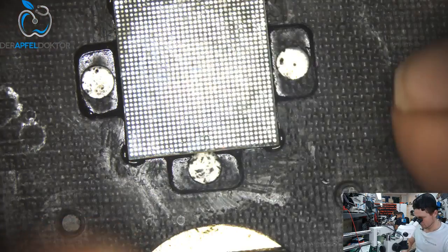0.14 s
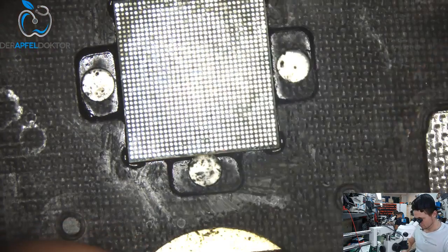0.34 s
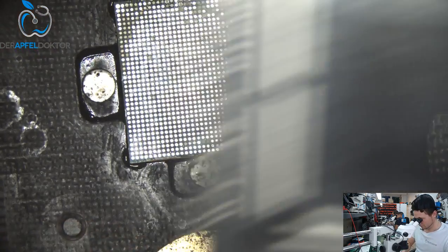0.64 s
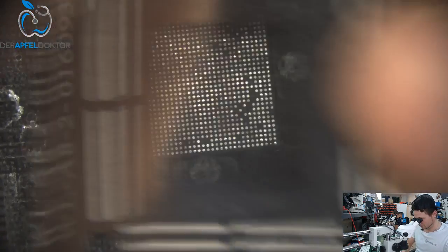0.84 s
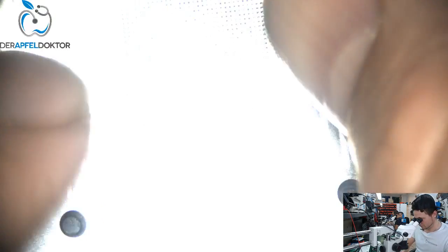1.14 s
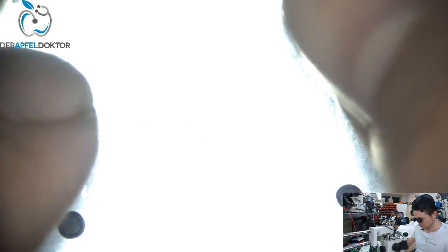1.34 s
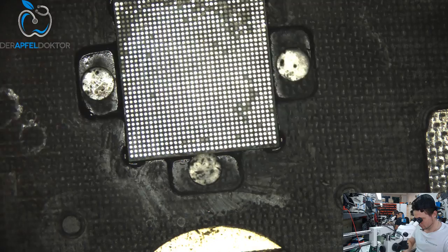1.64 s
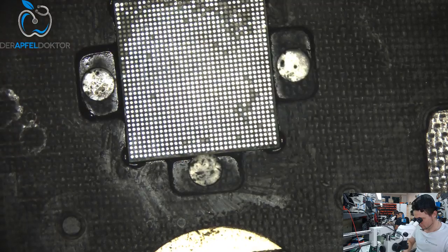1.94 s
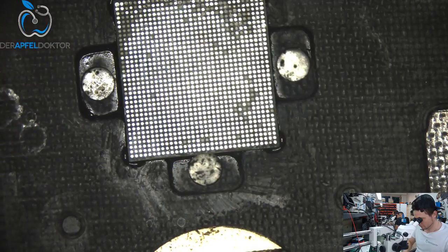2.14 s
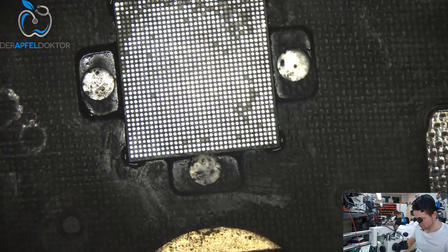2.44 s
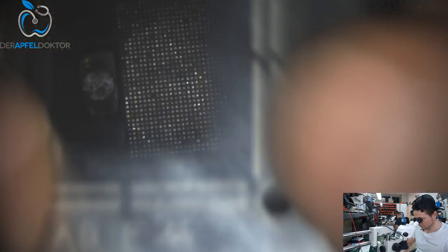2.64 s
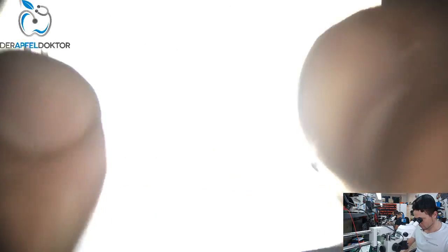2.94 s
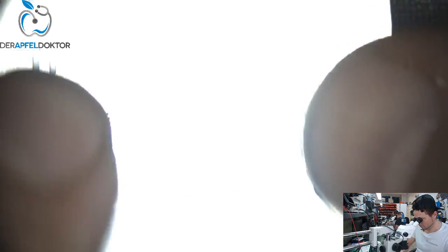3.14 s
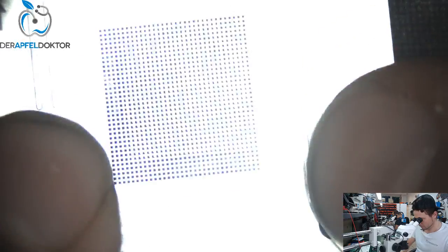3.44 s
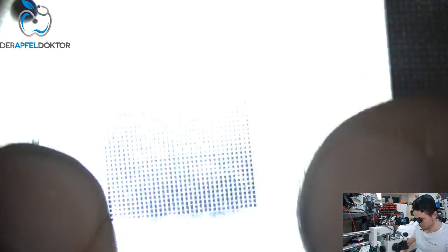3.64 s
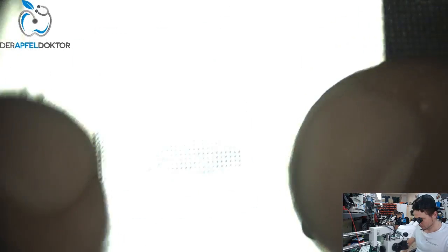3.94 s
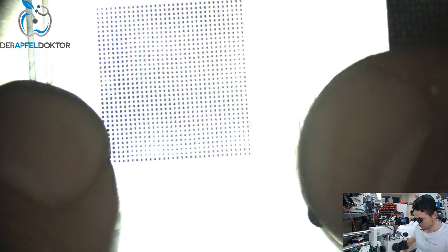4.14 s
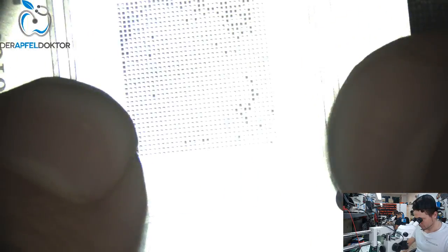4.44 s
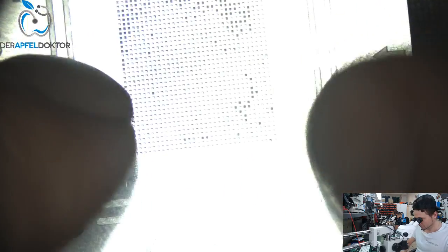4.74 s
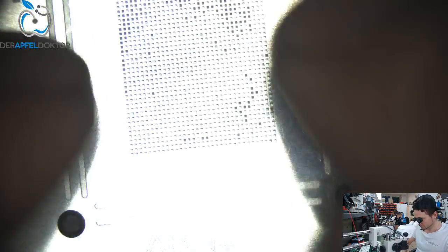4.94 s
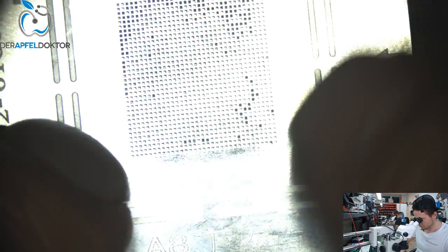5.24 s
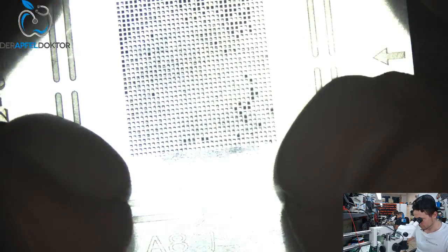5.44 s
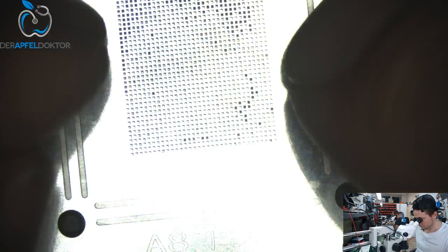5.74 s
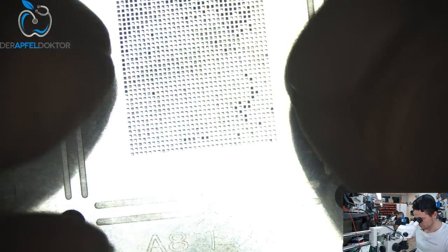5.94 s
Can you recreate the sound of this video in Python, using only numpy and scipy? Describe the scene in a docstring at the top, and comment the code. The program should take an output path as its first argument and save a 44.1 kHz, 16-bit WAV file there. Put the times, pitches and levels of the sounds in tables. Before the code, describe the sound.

In a small workshop, an air compressor clatters for an instant and switches off. Its valve releases a sharp hiss that whistles briefly, then fades over about two seconds. Close to the microphone, fingers knock and rub softly on a bench, and a thin metal sheet gives a few light, bright clicks as it is set down and moved. A faint electrical hum continues underneath.

```python
"""In a small workshop, over mains hum and quiet room noise, an air compressor shakes and clatters for a
last moment, then switches off with a soft clunk. Its relief valve snaps open: the escaping air hisses,
whistles briefly on the edge of the opening and dies away as the pipe empties.
Fingers knock and rub on the bench, and a thin metal sheet clicks and rings as it is set down and moved."""
import sys
import numpy as np
from scipy import signal
from scipy.fft import rfft, irfft
from scipy.io import wavfile

SR = 44100
rng = np.random.default_rng(int(sys.argv[2]) if len(sys.argv) > 2 else 0)


def unload_audio(sound):
    """Save the sound as a 16-bit wav file, at the path given as the first command line argument."""
    columns = np.transpose(np.atleast_2d(sound))
    # keep every value between -1 and 1, then stretch to whole-number steps
    steps = np.round(np.clip(columns, -1, 1) * 32767)
    wavfile.write(sys.argv[1], SR, steps.astype(np.int16))


N = 267687
TIME, BINS = np.arange(N) / SR, np.fft.rfftfreq(N, 1 / SR)  # each sample's time, each frequency in Hz

# the tones of the mains hum (pitch [Hz], level [dB], unsteadiness [0-1])
HUM_TONES = [(50.1, -57.5, 0.12), (98.4, -68.5, 0.4), (112.4, -76, 0.5), (149, -71, 0.19),
             (231, -84.5, 0.8), (282, -80, 0.84), (355, -81, 0.77), (516, -85, 0.7), (2370, -84, 0.7)]
# how the second hum tone grows and shrinks (time [s], gain [dB])
SECOND_TONE_GAIN = [(1.45, -8), (1.7, 4.5), (2.7, 0), (2.9, -7), (4.2, -9), (4.35, 5), (4.65, -2), (5.3, 1),
                    (5.75, 1.5), (6, -9)]
# the soft rush of air in the room (frequency [Hz], level [dB])
ROOM_AIR = [(120, -12), (200, -2), (278, -3.5), (327, -3.5), (358, -2), (386, -6.5), (516, -6.5), (743, -8),
            (942, -9), (1750, -12), (2340, -14), (15600, -20.5)]
# the deep rumble under it (frequency [Hz], level [dB])
ROOM_RUMBLE = [(8, -0.5), (18, 9.5), (30, -8.5), (70, -11), (170, -14.5), (260, -44), (600, -69)]
# noise that differs between left and right (frequency [Hz], level [dB])
STEREO_NOISE = [(10, 30.5), (45, 5), (200, 7.5), (600, 3.5), (2000, -1), (6000, 0.5), (15700, -1)]
# the tones of the shaking machine (multiple of shaft speed [times], level [dB])
SHAKE_TONES = [(1, -8), (2, -2.5), (4, -11), (6, -21), (8, -9.5), (10, -12)]
# the clatter from the pump's casing (frequency [Hz], level [dB])
CASING_NOISE = [(15, -27), (35, -10), (60, 5.5), (130, -4.5), (165, -6), (215, -2.5), (290, -8.5),
                (410, -11), (720, -12), (900, -6.5), (1500, -15.5), (1950, -10.5), (2500, -19), (3300, -47),
                (5500, -86)]
# the air noise of the running pump (frequency [Hz], level [dB])
PUMP_AIR = [(1470, -18), (2500, -12), (2740, -30), (3020, 1), (3270, -11), (3610, -8), (6060, -11),
            (9420, -3), (15000, -24)]
# the valve's hiss at high pressure (frequency [Hz], level [dB])
STRONG_HISS = [(410, -60), (700, -27), (908, -28), (1180, -25.5), (1780, -18.5), (1930, -18), (2770, -14.5),
               (3120, -10.5), (4490, -4), (4980, -9), (6290, -8.5), (9050, 2), (10200, 0.5), (12500, -8.5),
               (15600, -22.5)]
# the valve's hiss at low pressure (frequency [Hz], level [dB])
WEAK_HISS = [(1060, -29), (1800, -23), (2240, -25.5), (3120, -10), (3360, -17), (3510, -6), (4210, -2),
             (4740, -2.5), (5520, -14), (6920, -7), (7860, -2), (9500, 1), (10800, -6), (13500, -15),
             (15600, -34)]
# where the valve's opening, its port, rings (pitch [Hz], width [Hz], level [dB])
PORT_PEAKS = [(4200, 2800, 8.5), (9520, 1600, 11.5)]
# breathy notes near the port's lower peak (time [s], length [s], level [dB], pitch [Hz])
BREATHY_NOTES = [(0.403, 0.15, -36.5, 4600), (0.643, 0.14, -49, 4280), (1.166, 0.36, -48, 4300),
                 (1.547, 0.59, -60, 4400)]
# dull knocks on the bench (time [s], level [dB], contact time [s], favoured pitch [Hz])
BENCH_KNOCKS = [(1.081, -51.5, 0.015, 950), (1.325, -51, 0.012, 1000), (1.358, -61, .006, 646),
                (2.6846, -55.5, .011, 940), (2.782, -50, 0.011, 1120), (4.339, -53, 0.012, 610),
                (6.037, -56, 0.0051, 610)]
# the thud of the bench top (frequency [Hz], level [dB])
BENCH_THUD = [(150, -20), (380, -1), (600, 6), (850, 4), (1200, 2.5), (1600, -4), (2400, -11), (4000, -22),
              (8000, -60)]
# the ringing tones of the bench top (pitch [Hz], level [dB], time to fade by 60 dB [s])
BENCH_TONES = [(602, 0.5, 0.1), (830, 3, 0.21), (947, 1, 0.12), (1140, -2.5, 0.16)]
# clicks of the metal sheet (time [s], level [dB], contact time [s], brightness [dB per octave])
SHEET_CLICKS = [(1.083, -34, 0.0066, -1.5), (2.68, -55.5, 0.0016, -6), (2.7564, -47, 0.0021, -2),
                (2.778, -39.5, 0.0042, -3), (2.7818, -26.5, 0.0043, 2), (2.788, -30.5, 0.0017, 0),
                (4.048, -55, .0017, 3), (4.322, -58, .002, 7), (4.3325, -41.5, 0.0014, 4),
                (4.342, -35.5, .0018, -2.5), (4.698, -59.5, 0.0032, -8), (5.211, -57, .0015, 2),
                (5.602, -61, 0.0026, 4), (5.875, -69, .0035, -9), (5.9717, -56, .001, 4),
                (6.037, -44.5, 0.0018, -2.5)]
# the gritty noise in a click (frequency [Hz], level [dB])
CLICK_GRIT = [(200, -30), (500, -13), (2500, -14.5), (4300, -3.5), (6600, -9.5), (8500, 0), (11500, 0),
              (14000, -16), (15700, -20)]
# the ringing tones of the sheet (pitch [Hz], level [dB], time to fade by 60 dB [s])
SHEET_TONES = [(2480, -24.5, .03), (3310, -18.5, 0.032), (4556, -14, 0.04), (5610, -22.5, 0.055),
               (8280, -7.5, 0.022), (9300, -12, .025), (10080, -8, 0.032), (11400, -19, 0.022),
               (12400, -22, 0.022)]
# soft rubs of fingers and parts (time [s], level [dB], length [s], middle frequency [Hz])
FINGER_RUBS = [(1.898, -60, 0.032, 1860), (3.288, -69.5, 0.057, 1590), (4.893, -68, .083, 1005),
               (5.415, -62.5, .042, 1090)]
# moments when the sheet slides (time [s], level [dB], length [s])
SHEET_SLIDES = [(2.253, -66, 0.085), (4.288, -61.5, .009)]
# how long the room echoes (frequency [Hz], time to fade by 60 dB [s])
ECHO_TIMES = [(200, 0.55), (1000, 0.23), (5000, 0.3), (10000, 0.24), (15000, 0.42)]

VALVE_OPENS_S, SWITCH_S = 0.053, 0.07
TILT_PIVOT_HZ = 8000  # stays equally loud when the sheet's sound is made brighter or duller


def amp(db):
    """Turns decibels into a number to multiply by."""
    return 10 ** (np.asarray(db) / 20)


def unit(x):
    """Scales a signal to an average (rms) strength of 1."""
    return x / np.sqrt(np.mean(x ** 2) + 1e-20)


def read(points, hz):
    """Reads between the rows of a frequency table, spacing octaves evenly."""
    f, value = np.transpose(points)
    return np.interp(np.log(hz + 1), np.log(f + 1), value)


def noise(gain):
    """Noise of strength 1, shaped by a gain for each frequency."""
    return unit(irfft(rfft(rng.standard_normal(N)) * gain, N))


def table_noise(points):
    """Noise of strength 1, shaped by a table of levels."""
    return noise(amp(read(points, BINS)))


def bell(x, centre, width):
    """A smooth peak of height 1."""
    return 1 / (1 + (2 * (x - centre) / width) ** 2)


def swell(s, length):
    """A smooth rise to 1 and back around one moment."""
    return np.exp(-(2 * (TIME - s) / length) ** 2)


def drift(rate_hz):
    """A slow random wobble of strength 1."""
    return noise(bell(BINS, 0, 2 * rate_hz) ** 2)


def resonate(x, hz, width):
    """Keeps the sound near one pitch, which may move."""
    turn = np.exp(2j * np.pi * np.cumsum(hz * np.ones(len(x))) / SR)
    decay = np.exp(-np.pi * width / SR)
    return 2 * (turn * signal.lfilter([1 - decay], [1, -decay], x / turn + 1e-18)).real


def breathy(hz, width):
    """Noise narrowed twice around a pitch, so it sounds like a blown note."""
    return unit(resonate(resonate(rng.standard_normal(N), hz, width), hz, width))


def contact(s, length, rise_s=0.00026):
    """The push of one hit: it rises fast, then fades."""
    age = np.maximum(TIME - s, 0)
    return (1 - np.exp(-age / rise_s)) * np.exp(-age / length)


def ring(tones, age):
    """The fading tones of a struck object, one row each."""
    return np.array([amp(db - 60 * age / fade_s) * np.sin(2 * np.pi * (hz * age + rng.random()))
                     for hz, db, fade_s in tones])


def mains_hum():
    """The power supply hums in several tones, some steady and some wavering."""
    tones = []
    for hz, db, unsteady in HUM_TONES:
        steady = np.sqrt(1 - unsteady ** 2)
        waver = unsteady * (drift(2.5) + 1j * drift(6.9)) / np.sqrt(2)  # in both level and pitch
        wave = np.exp(2j * np.pi * (hz * TIME + rng.random()))
        tones.append(amp(db) * np.sqrt(2) * ((steady + waver) * wave).real)
    tones[1] *= amp(np.interp(TIME, *np.transpose(SECOND_TONE_GAIN)))
    return sum(tones)


def room_noise(air_db=-64.5, rumble_db=-64, side_db=-70, side_top_hz=15740):
    """Room air over a low rumble, a little different on the left and right."""
    middle = amp(air_db) * table_noise(ROOM_AIR) + amp(rumble_db) * table_noise(ROOM_RUMBLE)
    side = amp(side_db) * noise(amp(read(STEREO_NOISE, BINS)) * (BINS < side_top_hz))
    return np.array([middle + side, middle - side])


def compressor(shaft_hz=24, power_off_s=0.027, shake_db=-46.5, clatter_db=-43.5, air_db=-46):
    """The shaft shakes the machine and the piston clatters twice a turn; both die as the power is cut."""
    lost_hz = np.minimum(32 * TIME ** 2, shaft_hz)  # the shaft loses speed ever faster
    turns = np.cumsum(shaft_hz - lost_hz) / SR
    shake = np.zeros(N)
    for multiple, db in SHAKE_TONES:
        dulling_db = 7 * lost_hz * np.log(max(multiple / 2, 1))  # high tones fade first
        wave = np.sqrt(2) * np.cos(2 * np.pi * (multiple * turns + rng.random()))
        shake += amp(db - dulling_db) * wave
    shake *= amp(shake_db - 2.5 * lost_hz)
    strokes = 1 + 0.26 * np.cos(2 * np.pi * 2 * turns)
    fade_db = 133 * np.maximum(TIME - power_off_s, 0)
    clatter = amp(clatter_db - fade_db) * table_noise(CASING_NOISE)
    air = amp(air_db) * table_noise(PUMP_AIR) * np.exp(-(TIME / SWITCH_S) ** 2)
    return shake + (clatter + air) * strokes


def valve_hiss(start_db=-27, drain_db_per_s=12.5, empty_s=1.416, empty_db_per_s=27):
    """Rushing air makes a broad hiss that narrows to the port's ringing as the pipe empties."""
    age = np.maximum(TIME - VALVE_OPENS_S, 0)
    # the level falls steadily, then eases into a faster fall once the pipe is nearly empty
    time_empty = 0.076 * np.logaddexp(0, (TIME - empty_s) / 0.076)
    pipe_db = start_db - drain_db_per_s * age - empty_db_per_s * time_empty
    strong_share = np.interp(pipe_db, [-42, -31], [0, 1])
    ring_share = np.interp(pipe_db, [-52, -42], [0.71, 0])
    port_shape = sum(amp(db) * bell(BINS, hz, width) for hz, width, db in PORT_PEAKS)
    weak = np.sqrt(1 - ring_share) * table_noise(WEAK_HISS)
    weak += np.sqrt(ring_share) * noise(port_shape * bell(BINS, 11600, 14700))
    hiss = np.sqrt(strong_share) * table_noise(STRONG_HISS) + np.sqrt(1 - strong_share) * weak
    snap_open = 1 - np.exp(-age / 0.0075)
    dip_db = -2.5 * swell(s=0.28, length=0.19)  # just before the whistle
    surge_db = 2 * swell(s=0.53, length=0.3)  # as the whistle lets go
    flutter_db = 0.5 * drift(rate_hz=27)
    return hiss * snap_open * amp(pipe_db + dip_db + surge_db + flutter_db)


def switch_clunk(db=-47):
    """The pressure switch drops out with a soft, low clunk."""
    return amp(db) * noise(bell(BINS, 230, 150) ** 2) * contact(SWITCH_S, length=0.02)


def first_blast(db=-32):
    """The first burst of air makes the port ring at its upper peak."""
    return amp(db) * breathy(hz=9450, width=2400) * swell(s=0.097, length=0.061) * (TIME > VALVE_OPENS_S)


def edge_whistle(peak_s=0.367, db=-28.5, middle_hz=8130, glide_hz=1220, glide_s=0.11):
    """Air whistles once on the edge of the port, sliding up in pitch."""
    hz = middle_hz + glide_hz * np.tanh((TIME - peak_s) / glide_s)
    loudness = bell(TIME, peak_s, width=0.075) * (TIME > VALVE_OPENS_S)
    return amp(db) * breathy(hz, width=600) * loudness


def port_notes():
    """The air blows a few breathy notes on the port, like blowing across a bottle."""
    return sum(amp(db) * breathy(hz, width=1000) * swell(s, length) for s, length, db, hz in BREATHY_NOTES)


def bench_knocks(thud_boost_db=5, spot_width_hz=260, rise_s=0.001):
    """Fingers thud on the bench top; each spot they hit rings some of its tones more than others."""
    thud = table_noise(BENCH_THUD)
    age = np.arange(SR // 4) / SR
    out = np.zeros(N)
    for s, db, length, hz in BENCH_KNOCKS:
        out += amp(db + thud_boost_db) * thud * contact(s, length)
        weights = bell(np.array(BENCH_TONES)[:, 0], hz, spot_width_hz)
        ringing = (weights @ ring(BENCH_TONES, age)) * (1 - np.exp(-age / rise_s))
        slot = out[round(s * SR):][:len(age)]
        slot += amp(db) * ringing[:len(slot)]
    return out


def sheet_clicks(rise_s=0.00052, size=4096):
    """Each click is a short, gritty touch that sets the metal sheet ringing."""
    hz, age = np.fft.rfftfreq(size, 1 / SR), np.arange(size) / SR
    out = np.zeros(N)
    for s, db, length, brightness in SHEET_CLICKS:
        grit = unit(irfft(rfft(rng.standard_normal(size)) * amp(read(CLICK_GRIT, hz))))
        strike = grit * np.exp(-age / length) + ring(SHEET_TONES, age).sum(0)
        strike *= 1 - np.exp(-age / rise_s)
        tilt_db = brightness * np.log2(np.maximum(hz, SHEET_TONES[0][0]) / TILT_PIVOT_HZ)
        click = irfft(rfft(strike) * amp(tilt_db))
        slot = out[round(s * SR):][:size]
        slot += amp(db) * np.sqrt(2) * click[:len(slot)]
    return out


def finger_rubs():
    """Fingers and parts rub, making short, soft swells of noise."""
    return sum(amp(db) * noise(bell(BINS, hz, width=0.86 * hz)) * swell(s, length)
               for s, db, length, hz in FINGER_RUBS)


def sheet_slides(width_hz=160, tilt_db_per_octave=-8):
    """Light rubbing keeps the sliding sheet ringing faintly, favouring its lower tones."""
    peaks = sum(amp(db + tilt_db_per_octave * np.log2(hz / TILT_PIVOT_HZ)) * bell(BINS, hz, width_hz)
                for hz, db, _ in SHEET_TONES)
    return noise(peaks) * sum(amp(db) * swell(s, length) for s, db, length in SHEET_SLIDES)


def room(x, echo_db, near_db, near_fade_s=0.046):
    """Sound arrives directly, then bounces off the nearby bench, then echoes briefly round the room."""
    size = SR // 2
    age = np.arange(size) / SR
    early, late = rng.standard_normal((2, size))
    near = early * amp(-60 * age / near_fade_s) * (age > 0.001)
    hz, t, bands = signal.stft(late * (age > 0.008), SR, nperseg=256)
    bands *= amp(-60 * t / read(ECHO_TIMES, hz)[:, None])  # each frequency fades at its own speed
    echo = signal.istft(bands, SR, nperseg=256)[1][:size]
    response = amp(echo_db) * echo / np.linalg.norm(echo) + amp(near_db) * near / np.linalg.norm(near)
    response[0] += 1  # the direct sound
    return signal.fftconvolve(x, response / np.linalg.norm(response))[:N]


def scene():
    """The compressor across the room and the hands close by, heard from one spot."""
    air = room(valve_hiss() + edge_whistle() + first_blast() + port_notes(), echo_db=-1, near_db=-6.5)
    machine = room(compressor() + switch_clunk(), echo_db=-16, near_db=-15.5)
    sheet = room(sheet_clicks() + sheet_slides(), echo_db=-10.5, near_db=-9.5)
    bench = room(bench_knocks() + finger_rubs(), echo_db=-4.5, near_db=-16)
    return air + machine + sheet + bench + mains_hum() + room_noise()


def record(dry):
    """Cuts away the very highest treble, above 15740 Hz."""
    low_pass = signal.firwin(511, 15740, window=("kaiser", 9), fs=SR)
    return signal.oaconvolve(dry, low_pass[None], "same")


dry = scene()
out = record(dry)
unload_audio(out)
```